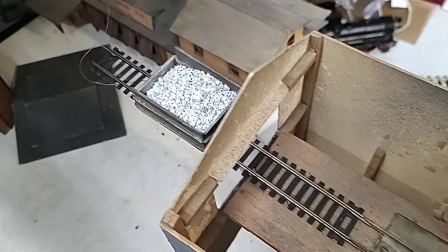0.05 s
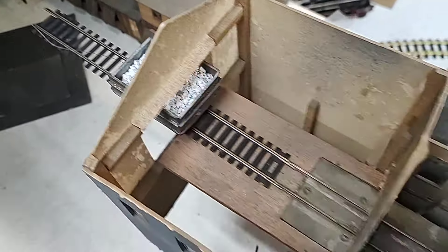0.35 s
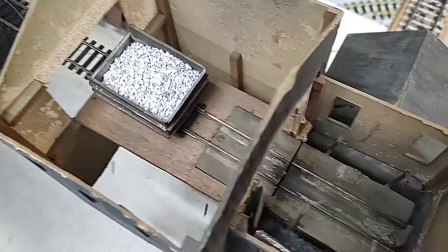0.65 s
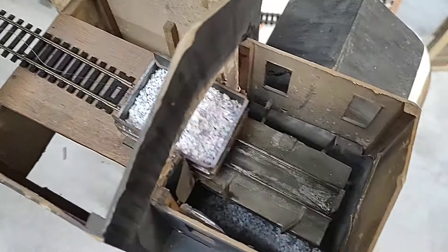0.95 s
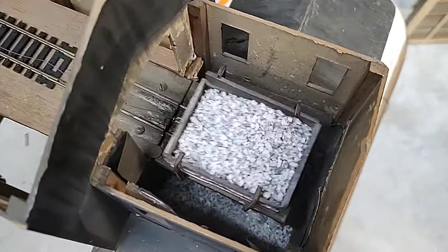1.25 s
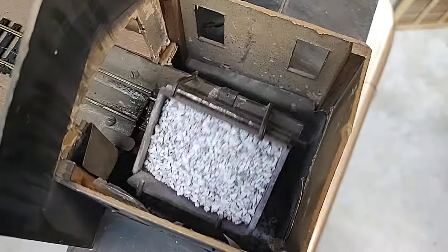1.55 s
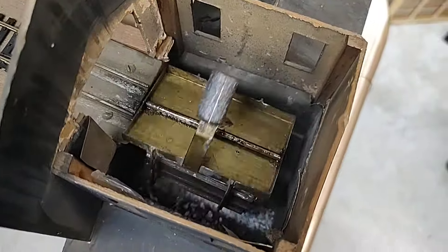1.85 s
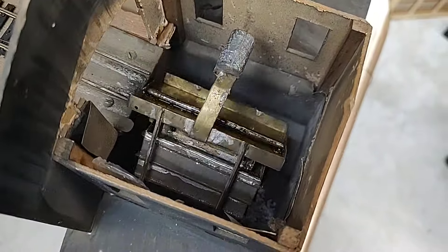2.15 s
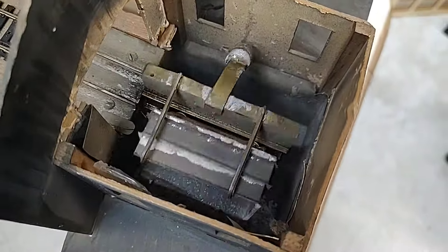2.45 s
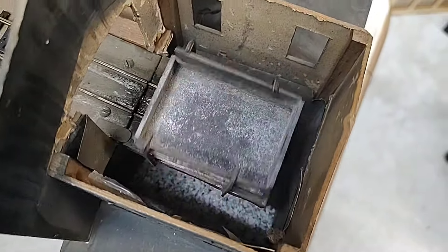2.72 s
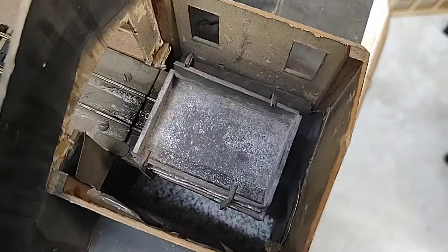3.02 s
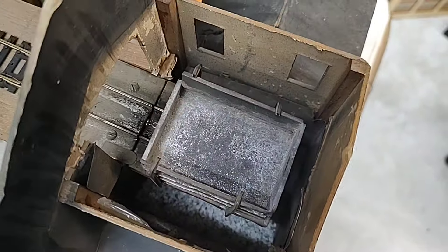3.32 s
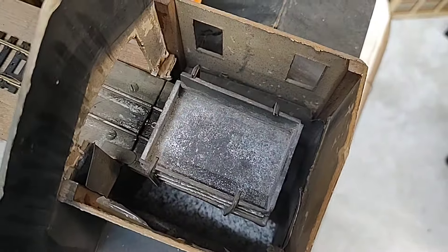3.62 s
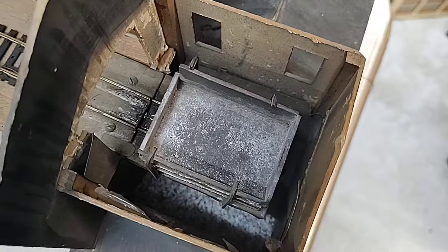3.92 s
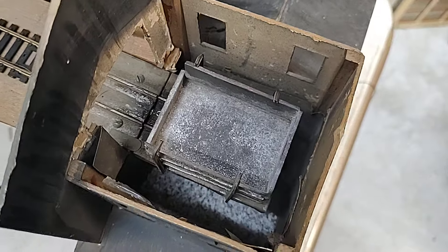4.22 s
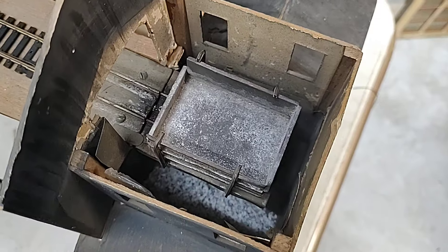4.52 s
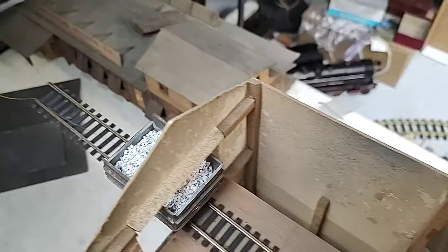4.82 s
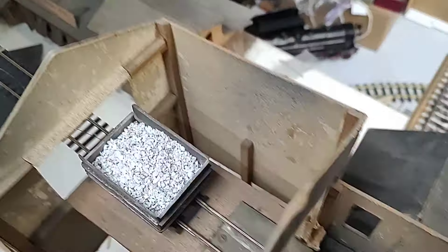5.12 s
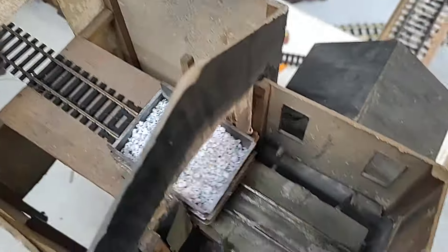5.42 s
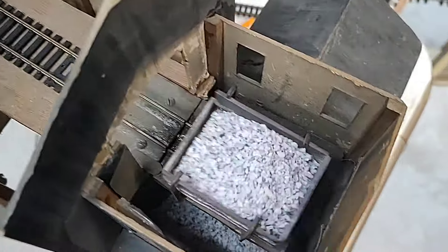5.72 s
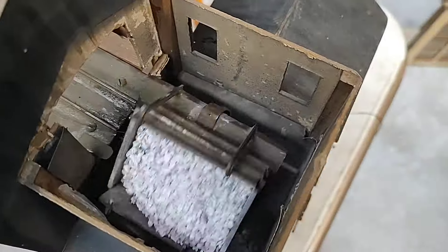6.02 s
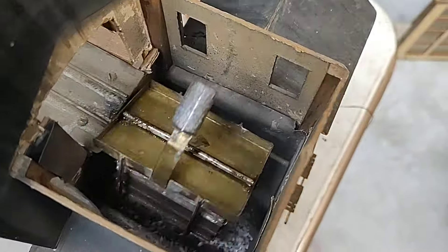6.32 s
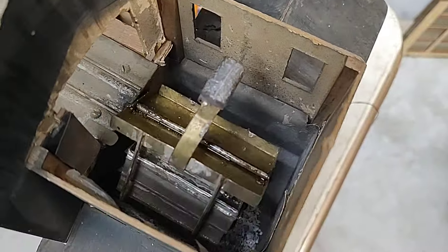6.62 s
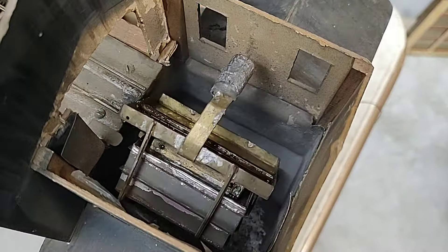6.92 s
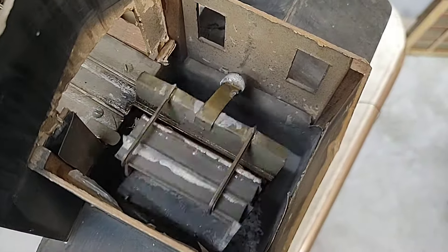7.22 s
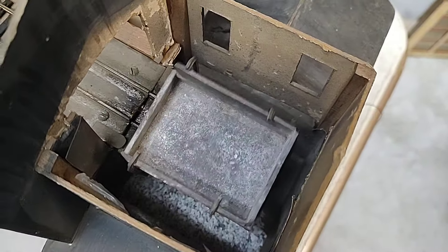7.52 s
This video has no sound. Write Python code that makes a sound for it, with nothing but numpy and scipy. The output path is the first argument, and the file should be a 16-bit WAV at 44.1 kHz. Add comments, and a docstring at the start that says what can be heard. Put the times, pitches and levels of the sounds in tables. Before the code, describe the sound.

Twice, a small gravel car clatters over rail joints, stones pour out in surges, and a tipping cradle knocks back into place.

```python
"""Over a low room rumble, a model mine car full of gravel rolls in, chattering at the rail joints.
Inside a wood and card shed a tipping cradle turns it over, stones pour down a chute in surges,
and the cradle drops back with a clatter. The knocks and stones make the shed ring in a small room.
It all happens twice, heard close up and from a new spot the second time.
Between the two runs, a dry pop and a hollow blip sound on the right."""
import sys
import numpy as np
from scipy import signal
from scipy.fft import rfft, irfft
from scipy.io import wavfile

SR = 44100
rng = np.random.default_rng(int(sys.argv[2]) if len(sys.argv) > 2 else 0)


def wav_out(sig):
    """Save sig, one row per channel (or a flat mono array), as 16-bit PCM at SR to the path in sys.argv[1]."""
    wavfile.write(sys.argv[1], SR, np.round(np.clip(np.atleast_2d(sig).T, -1, 1) * 32767).astype(np.int16))


N = 337806
TIME = np.arange(N) / SR
TAPS = 4096  # filter length in samples
FREQ = np.maximum(np.arange(TAPS // 2 + 1) * SR / TAPS, 1)
SECOND_RUN_S, POUR_STARTS_S = 4.79, (1.816, 6.23)


def undb(db):
    """Turn decibels into a plain multiplier."""
    return 10 ** (np.asarray(db) / 20)


def fader(rows, column=1):
    """A volume curve through (time_s, level_db) rows, silent before and after them."""
    rows = np.array(rows)
    playing = (TIME >= rows[0, 0]) * (TIME <= rows[-1, 0])
    return undb(np.interp(TIME, rows[:, 0], rows[:, column])) * playing


def colour(rows):
    """A tone curve, saying how strong each pitch is, for each decibel column of a table."""
    hz, *columns = np.transpose(rows)
    return undb([np.interp(np.log(FREQ), np.log(hz), db) for db in columns])


def cutoff(hz, keep="low"):
    """A gentle filter that keeps the low or the high side of hz."""
    return signal.butter(2, hz, keep, fs=SR, output="sos")


def ring(sound, tone):
    """Give a sound a tone curve; white noise keeps its overall power."""
    # folding the cepstrum makes the ringing follow each hit, never come before it
    cepstrum = irfft(np.log(tone + 1e-7))
    cepstrum[:, 1:TAPS // 2] *= 2
    cepstrum[:, TAPS // 2 + 1:] = 0
    response = irfft(np.exp(rfft(cepstrum)))
    response /= np.sqrt(np.mean(np.sum(response ** 2, axis=1)))
    return signal.oaconvolve(sound, response, axes=1)[:, :N]


def stereo_noise(apart_hz):
    """White noise, alike left and right in the bass and unrelated above apart_hz."""
    mid, side = rfft(rng.standard_normal((2, N)))
    hz = np.arange(len(mid)) * SR / N
    share = .5 * hz ** 2 / (hz ** 2 + apart_hz ** 2)
    mid, side = mid * np.sqrt(1 - share), side * np.sqrt(share)
    return irfft([mid + side, mid - side], N)


def grains(per_s, spread_db, fade_s):
    """The flickering power of many tiny hits, big and small; it averages 1."""
    size = undb(spread_db * np.minimum(rng.standard_normal(N), 2)) ** 2
    hits = (rng.random(N) < per_s / SR) * size
    power = signal.lfilter([1], [1, -np.exp(-1 / (fade_s * SR))], hits)
    return power / power.mean()


def clinks(level, per_s, low_hz, high_hz, ring_s, spread_db=4.5):
    """Small struck things ring at random times, each at its own pitch, as loud as level allows."""
    out, age = np.zeros((2, N)), TIME[:SR // 16]
    starts = np.flatnonzero(rng.random(N) < per_s / SR)
    draws = rng.random((len(starts), 6))
    for i, (pitch, decay, size, pan, *phases) in zip(starts, draws):
        if level[i] > 0 and i + len(age) < N:
            hz = low_hz * (high_hz / low_hz) ** pitch
            fade = np.exp(-np.log(1000) * age / (ring_s * (.5 + decay)))
            sides = np.sqrt([[pan / 2], [1 - pan / 2]])
            note = np.sin(2 * np.pi * (hz * age + np.array(phases)[:, None]))
            out[:, i:i + len(age)] += level[i] * undb(spread_db * 2 * size) * fade * sides * note
    return out


# How loud the room rumbles: time_s, level_db
ROOM_LEVELS = [(0, -57), (.8, -49.5), (2.5, -54), (4.77, -50.5), (4.81, -64.5), (5.9, -59.5), (6.05, -78.5),
               (6.85, -88.5), (7.66, -94)]
# Tone of the rumble: pitch_hz, level_db
ROOM_TONE = [(18, -58), (30, -41.5), (106, 1), (336, -10.5), (384, -11), (426, -9.5), (649, -17),
             (760, -12.5), (1070, -23.5), (2230, -24.5), (3140, -30.5), (16000, -67.5)]
# Tone of the hiss: pitch_hz, level_db
HISS_TONE = [(18, -53.5), (30, -21), (461, 3), (1350, -9.5), (1460, -6), (2350, -8.5), (3490, -3),
             (6050, -22), (11100, -24.5), (16000, -16.5)]
def room(hiss_db=-77, flutter_below_hz=450):
    """A rumble whose bass flutters, over a faint, even hiss."""
    rumble = ring(stereo_noise(apart_hz=1060), colour(ROOM_TONE))
    bass = signal.sosfiltfilt(cutoff(flutter_below_hz), rumble)
    flutter = np.sqrt(grains(per_s=120, spread_db=4, fade_s=.02))
    hiss = ring(stereo_noise(apart_hz=900), colour(HISS_TONE))
    return fader(ROOM_LEVELS) * (rumble + (flutter - 1) * bass) + undb(hiss_db) * hiss


def room_echo(sound, echo_db=-10, low_ring_s=.2, high_ring_s=.12, build_s=.0015, high_db=-2):
    """A small room's walls return a blur of echoes; the treble dies first."""
    age = TIME[:SR // 2]
    noise = stereo_noise(apart_hz=990)[:, :SR // 2]
    low = signal.sosfilt(cutoff(2500), noise) * np.exp(-np.log(1000) * age / low_ring_s)
    high = signal.sosfilt(cutoff(2500, "high"), noise) * np.exp(-np.log(1000) * age / high_ring_s)
    tail = (low + undb(high_db) * high) * (1 - np.exp(-age / build_s))
    tail /= np.sqrt(np.sum(tail ** 2) / 2)
    return undb(echo_db) * signal.oaconvolve(sound, tail, axes=1)[:, :N]


def pop(at_s=3.4336, hz=700, width_s=.00056, db=-11, edge_hz=1900, edge_db=-27, edge_s=.0016):
    """A dry pop: one swing of air pressure with a brief, bright edge."""
    age = TIME - at_s
    swing = -undb(db) * np.sin(2 * np.pi * hz * age) * np.exp(-(age / width_s) ** 2)
    edge = (age > 0) * np.sin(2 * np.pi * edge_hz * age) * np.exp(-abs(age) / edge_s)
    return swing + undb(edge_db) * edge


def blip(start_s=4.7913, hz=588, fade_s=.021, db=-15.5):
    """A short, hollow blip that starts with a click."""
    age = TIME - start_s
    return -undb(db) * (age >= 0) * np.cos(2 * np.pi * hz * age) * np.exp(-(age / fade_s) ** 2)


def rub(levels, hz, half_width_hz):
    """Metal slides on metal in tiny slips that wake one ringing note."""
    slips = np.sqrt(grains(per_s=900, spread_db=3, fade_s=.003)) * stereo_noise(apart_hz=1300)
    return fader(levels) * ring(slips, 1 / (1 + ((FREQ[None] - hz) / half_width_hz) ** 2))


# The cradle's pivot rubbing: time_s, level_db
PIVOT_LEVELS = [(7.1, -86), (7.19, -72), (7.28, -62), (7.34, -74.5), (7.42, -85)]
# The brass flap scraping: time_s, level_db
FLAP_LEVELS = [(2.12, -58), (2.245, -41), (2.29, -53.5), (2.8, -63), (3.7, -73)]
def pivot_and_flap():
    """The pivot rubs low as the cradle swings back; the flap scrapes thinly, more on the right."""
    pivot = rub(PIVOT_LEVELS, hz=329, half_width_hz=44)
    flap = rub(FLAP_LEVELS, hz=3790, half_width_hz=150)
    return pivot + flap * undb([[-3], [1.5]])


# How loud the sliding grit is: time_s, level_db
GRIT_LEVELS = [(2.06, -47), (2.2, -49), (2.32, -56.5), (3.6, -61.5), (3.8, -71), (4.3, -83)]
# Tone of the grit: pitch_hz, left_db, right_db
GRIT_TONE = [(1500, -26, -14), (3510, -14, -7), (4600, -16.5, -7.5), (6500, -17.5, -12.5),
             (10600, -22, -29), (15760, -11, -24)]
def trickle():
    """After the first load, fine grit keeps sliding down the chute with a thin hiss."""
    hiss = np.sqrt(grains(per_s=3000, spread_db=14, fade_s=.0032)) * stereo_noise(apart_hz=1500)
    return fader(GRIT_LEVELS) * ring(hiss, colour(GRIT_TONE))


def loose_stones(db=-61, lead_s=.3, fade_db_per_s=20):
    """Stones shift and tinkle as the car starts to tip, then slowly come to rest."""
    ages = [TIME - pour_s + lead_s for pour_s in POUR_STARTS_S]
    level = sum((age > 0) * undb(db - fade_db_per_s * abs(age)) for age in ages)
    return clinks(level, per_s=260, low_hz=1003, high_hz=4100, ring_s=.054, spread_db=5)


# Pitches boosted in every hit: notes of the shed's floor and walls (one is a dip), and a bright sheen near 15
# kHz: pitch_hz, width_hz, boost_db
SHED_NOTES = [(160, 40, 3), (270, 40, 3), (388, 50, 5), (475, 60, -3), (594, 70, 13), (690, 60, 5),
              (1010, 50, 3), (1160, 60, 7), (1810, 80, 3), (3130, 110, 4), (3390, 100, 4), (4380, 140, 4),
              (15300, 1400, 4)]
def shed(powers, tone, thud_top_hz=1550, clack_top_hz=6700):
    """Hits ring the shed's panels: three power curves become low thud, middle clack and high tick."""
    boost = undb(sum(db / (1 + (2 * (FREQ - hz) / width) ** 2) for hz, width, db in SHED_NOTES))
    body = colour(tone) * boost
    under_thud, under_clack = (1 / (1 + (FREQ / hz) ** 12) for hz in (thud_top_hz, clack_top_hz))
    shares = under_thud, under_clack * (1 - under_thud), 1 - under_clack
    return sum(ring(np.sqrt(power) * stereo_noise(apart_hz=2340), body * np.sqrt(share))
               for power, share in zip(powers, shares))


# Stray stones dropping: start_s, level_db, hardness_db
STONE_DROPS = [(1.609, -53, -5), (1.639, -51, -13), (1.752, -53.5, 6), (2.247, -44.5, 0), (3.965, -66, -1),
               (4.258, -69.5, 5), (4.9, -60.5, 7), (5.911, -37, -4.5), (5.953, -48, -15), (6.017, -53, -2),
               (6.065, -43.5, -18), (6.141, -49, -4), (6.58, -44, -20), (6.749, -60, -22)]
def stray_stones(fade_s=.0032, thud_db=-7):
    """Thud, clack and tick power of single stones landing, each with one light tap."""
    taps = np.zeros((3, N))
    for start_s, db, hardness_db in STONE_DROPS:
        taps[:, int(start_s * SR)] = undb([db + thud_db, db, db + hardness_db]) ** 2
    return signal.lfilter([1], [1, -np.exp(-1 / (fade_s * SR))], taps)


# Wheels rolling, one list for each run: time_s, rumble_db, rattle_db
ROLL_LEVELS = [
    [(0.0, -62.5, -74), (0.19, -52.5, -72), (0.508, -46.5, -61.5), (0.908, -36, -51.5), (1.068, -34, -42),
     (1.188, -40.5, -49), (1.274, -32.5, -49), (1.456, -49.5, -55), (1.6, -59, -70)],
    [(4.82, -53, -61.5), (4.966, -50.5, -60.5), (5.08, -44.5, -55), (5.512, -34.5, -40.5),
     (5.624, -39, -41.5), (5.71, -39, -40), (5.75, -39, -41), (5.894, -52.5, -54), (6.05, -68.5, -65)],
]
def wheels(thud_db=-6, clack_db=1, tick_db=-19, jolt_db=(-5, -6, -19)):
    """Thud, clack and tick power of rolling: rough wheels rumble, the load jiggles, uneven rails jolt."""
    rumble, rattle = (sum(fader(run, column) for run in ROLL_LEVELS) for column in (1, 2))
    roughness = grains(per_s=350, spread_db=3, fade_s=.0018)
    jiggle = grains(per_s=350, spread_db=5, fade_s=.013)
    jolts = (undb(jolt_db)[:, None] * rattle) ** 2 * grains(per_s=39, spread_db=1.5, fade_s=.003)
    thud = (rumble * undb(thud_db)) ** 2 * roughness
    clack, tick = ((rattle * undb(db)) ** 2 * jiggle for db in (clack_db, tick_db))
    return jolts + np.array([thud, clack, tick])


# Natural notes of the hollow track bed: pitch_hz, width_hz, level_db
TRACK_NOTES = [(104, 34, -3.5), (174, 45, -2.5), (269.4, 74, -2.5), (682, 77, 1.5), (901, 100, -3)]
def track_hum(db=-8.5, low_cut_hz=70):
    """The rolling wheels keep the hollow bed under the track humming."""
    notes = sum(undb(peak_db) / (1 + (2 * (FREQ - hz) / width) ** 2) for hz, width, peak_db in TRACK_NOTES)
    tone = notes[None] * FREQ ** 2 / (FREQ ** 2 + low_cut_hz ** 2)
    shaking = np.sqrt(grains(per_s=250, spread_db=2, fade_s=.0013)) * stereo_noise(apart_hz=2400)
    return undb(db) * sum(fader(run) for run in ROLL_LEVELS) * ring(shaking, tone)


# Wheel rims striking the rail: start_s, pitch_hz, left_db, right_db
RIM_HITS = [(1.313, 2800, -18.5, -38), (1.329, 2770, -22, -40), (5.719, 3200, -37, -30.5),
            (5.7532, 3000, -30, -34.5), (5.766, 3560, -31, -16.5), (5.815, 3200, -45, -18)]
def rim_pings(ring_s=.022):
    """The lip on a wheel's rim strikes the rail and rings on one note."""
    out, age = np.zeros((2, N)), TIME[:SR // 16]
    for start_s, hz, *sides_db in RIM_HITS:
        ping = np.sin(2 * np.pi * hz * age) * np.exp(-np.log(1000) * age / ring_s)
        start = int(start_s * SR)
        out[:, start:start + len(age)] += undb(sides_db)[:, None] * ping
    return out


def knocks(rows, gap_s, rise_s, thud_db, tick_db, settle_s=.011, usual_push_s=.0035):
    """Thud, clack and tick power of knocks: a crack, a bounce gap_s later, and loose parts chattering."""
    # one value each for thud, clack and tick
    crack_db, chatter_db, crack_stretch = (1.5, 2, 2), (-6, -8, -8), (1.3, 1.05, .75)
    power = np.zeros((3, N))
    chatter = grains(per_s=270, spread_db=2, fade_s=.0053)
    for start_s, db, hardness_db, bounce_db in rows:
        # a harder hit thuds less, ticks more and is over sooner
        levels_db = db + thud_db - .83 * hardness_db, db, db + tick_db + hardness_db
        push_s = usual_push_s * 2 ** (-hardness_db / 24)
        for hit_s, hit_db in ((start_s, 0), (start_s + gap_s, bounce_db)):
            span = slice(int(hit_s * SR), int(hit_s * SR) + SR // 8)
            age = TIME[span] - TIME[span.start]
            rise = 1 - np.exp(-age / rise_s)
            # a longer push shakes more loose parts
            shaken = push_s / usual_push_s * np.exp(-age / settle_s) * chatter[span]
            for band, level_db in enumerate(levels_db):
                crack = undb(crack_db[band]) ** 2 * np.exp(-age / (push_s * crack_stretch[band]))
                settle = undb(chatter_db[band]) ** 2 * shaken
                power[band, span] += undb(level_db + hit_db) ** 2 * (crack + settle) * rise
    return power


# The cradle hitting its stops: start_s, level_db, hardness_db, bounce_db
CRADLE_HITS = [(1.696, -42, -4, -10), (2.79, -46, -6, -7), (2.8797, -30.5, -2.5, 5), (2.905, -21, 0, -12),
               (2.995, -41.5, -2, -16), (3.209, -53.5, -11.5, -9), (7.257, -62, -2, -9.5),
               (7.337, -67, -13.5, -5.5), (7.432, -48.5, 2.5, -9), (7.532, -47.5, -3, -10),
               (7.548, -32, 5, -15), (7.58, -25, -0.5, -1.5), (7.598, -21.5, 3.5, -4),
               (7.638, -31, -2.5, -10)]
def cradle_stops():
    """Power of the heavy cradle landing on its stops, a softer blow than a wheel's."""
    return knocks(CRADLE_HITS, gap_s=.0125, rise_s=.0016, thud_db=-2, tick_db=-9.5)


# Wheels hitting rail joints: start_s, level_db, hardness_db, bounce_db
JOINT_HITS = [(0.468, -53.5, -12, -20), (0.786, -47.5, -11, -5), (0.878, -35.5, -8.5, 0),
              (0.904, -30.5, 7.5, -6), (0.928, -31.5, -2, -23), (0.963, -27.5, -0.5, -10),
              (0.992, -31.5, 5, 2), (1.019, -31, -4, -16), (1.0244, -24, 7, -10), (1.075, -30.5, -5.5, -22),
              (1.13, -29.5, -2.5, -4.5), (1.188, -32.5, -9, -0.5), (1.206, -31.5, 5, -6),
              (1.2758, -33, 2.5, -10), (1.327, -33.5, -4, -0.5), (1.372, -31.5, 14.5, -11),
              (1.392, -40, -8.5, -20), (1.443, -48.5, -12.5, -7), (5.119, -42, -9, -21),
              (5.185, -40, 1.5, -7), (5.277, -35.5, -5, -7), (5.36, -34.5, -9, -14),
              (5.374, -26.5, 0, -3.5), (5.44, -24.5, 1, -2.5), (5.471, -32, 5, -14), (5.506, -21.5, 2, -27),
              (5.551, -24.5, -2, -22), (5.606, -28.5, 2, 1.5), (5.631, -39, -4, -16),
              (5.6634, -25.5, -0.5, -12), (5.679, -26.5, -1, -18), (5.72, -34, -4, -20),
              (5.7519, -24, 4, -2), (5.848, -24, 7.5, -1)]
def rail_joints():
    """Power of the wheels knocking sharply where two rails meet."""
    return knocks(JOINT_HITS, gap_s=.0132, rise_s=.0003, thud_db=-3, tick_db=-13.5)


# Tone of the hits from each listening spot: pitch_hz, left_db, right_db
FIRST_SPOT_TONE = [(49.2, -28, -33), (111, -15.5, -13.5), (395.3, -0.5, -3), (810, -3, -2.5),
                   (1476, -7.5, -3.5), (2040, 5, 2.5), (2910, 6, 10.5), (4350, -13, 0), (5760, -19.5, -5.5),
                   (6700, -14.5, -5.5), (8310, -16.5, -28), (10960, -18.5, -31), (13500, -15, -30.5),
                   (15630, -16, -27.5)]
SECOND_SPOT_TONE = [(50, -49.5, -52.5), (114, -18.5, -25.5), (414, -4, -3.5), (704, -6, -6.5),
                    (1490, -10.5, -7), (2055, 1.5, -6), (3110, -4.5, 12), (4840, -14.5, 0),
                    (5940, -23.5, -21.5), (7000, -19.5, -17), (8400, -24, -26.5), (11030, -25, -32),
                    (13590, -25, -24), (15600, -18, -51)]
def mine_car(clink_db=-4, tub_db=-10):
    """Knocks and rolling shake the shed, while the wheels clink and the car's tub rings hollow."""
    power = rail_joints() + cradle_stops() + stray_stones() + wheels()
    thud, clack, _ = np.sqrt(power)
    wheel_clinks = clinks(clack, per_s=260, low_hz=2600, high_hz=4700, ring_s=.03)
    tub = clinks(thud, per_s=160, low_hz=643, high_hz=1498, ring_s=.049, spread_db=2.5)
    first_run = shed(power * (TIME < SECOND_RUN_S), FIRST_SPOT_TONE)
    second_run = shed(power * (TIME >= SECOND_RUN_S), SECOND_SPOT_TONE)
    return first_run + second_run + undb(clink_db) * wheel_clinks + undb(tub_db) * tub


# Gravel flowing into the chute, one list for each load: time_s, level_db
POUR_LEVELS = [
    [(1.77, -61), (1.824, -45), (1.84, -27.5), (1.898, -32.5), (1.918, -22.5), (1.952, -28), (1.964, -31.5),
     (2.002, -23), (2.062, -33.5), (2.13, -63)],
    [(6.19, -66.5), (6.224, -57), (6.242, -33), (6.276, -26.5), (6.332, -34), (6.368, -24), (6.398, -36.5),
     (6.42, -26), (6.452, -26.5), (6.468, -35.5), (6.5, -32.5), (6.506, -40.5), (6.62, -71.5)],
]
# Tone of the gravel: pitch_hz, left_db, right_db
GRAVEL_TONE = [(98.6, -32, -28.5), (230, -14, -20), (393, -8.5, -6), (712, -2.5, -4.5), (1460, -8, -4),
               (2030, 0.5, -5.5), (3160, -6, 5.5), (4670, -4, -1), (5550, -17, -14), (6940, -13, -11),
               (8450, -15, -19.5), (11000, -18, -19.5), (13600, -12, -27), (15250, -11.5, -16.5)]
def gravel(clink_db=-6, flap_cut_hz=460, chute_cut_hz=115, fill_s=.2):
    """The load slides out in surges; thousands of stones a second strike the chute and each other."""
    # the first stones only hit the light flap; the tone deepens as the rest reach the chute's bottom
    depth = sum(np.clip((TIME - s) / fill_s, 0, 1) ** 2 * (TIME < s + 1) for s in POUR_STARTS_S)
    # one value each for thud, clack and tick
    early_db, late_db, second_spot_db = (-9, 1.5, 4), (2, 1.5, 0), (-.5, -.5, -3)
    bands_db = np.outer(early_db, 1 - depth) + np.outer(late_db, depth)
    bands_db += np.outer(second_spot_db, TIME >= SECOND_RUN_S)
    flow = sum(fader(load) for load in POUR_LEVELS) * undb(bands_db)
    stone_clinks = clinks(flow[1], per_s=450, low_hz=2000, high_hz=6400, ring_s=.028)
    hits = flow ** 2 * grains(per_s=2500, spread_db=4, fade_s=.0012)
    stones = shed(hits, GRAVEL_TONE) + undb(clink_db) * stone_clinks
    flap, chute = (signal.sosfiltfilt(cutoff(hz, "high"), stones) for hz in (flap_cut_hz, chute_cut_hz))
    return (1 - depth) * flap + depth * chute


def scene(right_lag_samples=9):
    """The model in its room, reaching the left ear first; the pop and blip are on the right only."""
    rubbing = pivot_and_flap()
    left, right = mine_car() + rim_pings() + track_hum() + gravel() + loose_stones() + trickle() + rubbing
    model = np.array([left, np.pad(right, (right_lag_samples, 0))[:N]])
    return model + room_echo(model) + room() + np.outer([0, 1], pop() + blip())


def record(dry, low_cut_hz=48, top_hz=16000):
    """Thin out the deep bass and cut off the highest treble."""
    thinned = signal.sosfilt(cutoff(low_cut_hz, "high"), dry)
    return signal.sosfilt(signal.ellip(10, .2, 70, top_hz, fs=SR, output="sos"), thinned)


dry = scene()
out = record(dry)
wav_out(out)
```